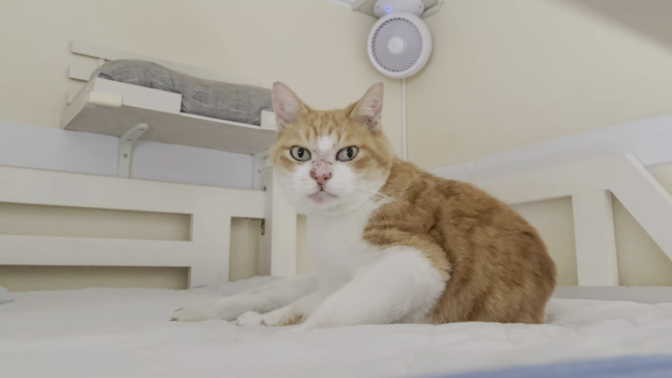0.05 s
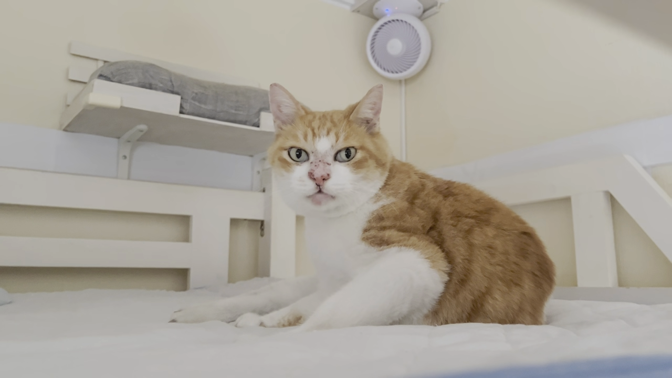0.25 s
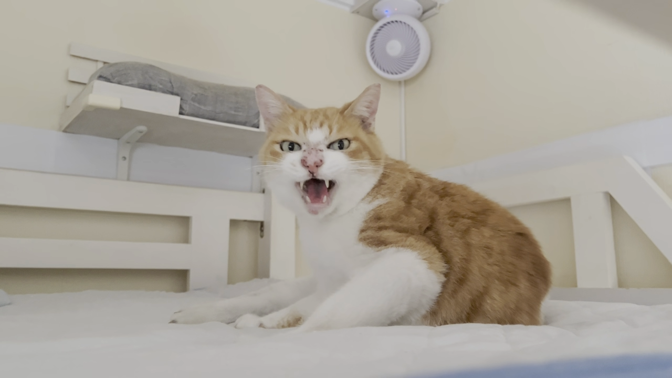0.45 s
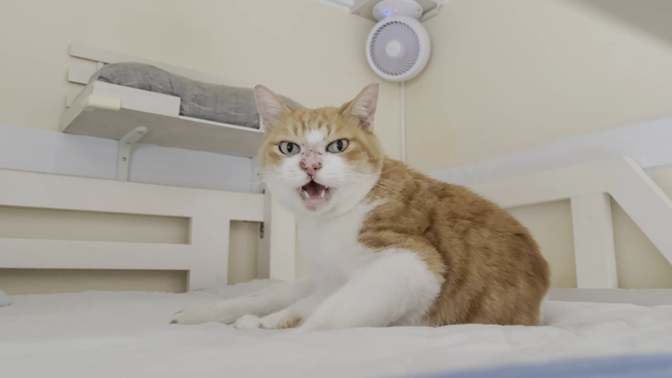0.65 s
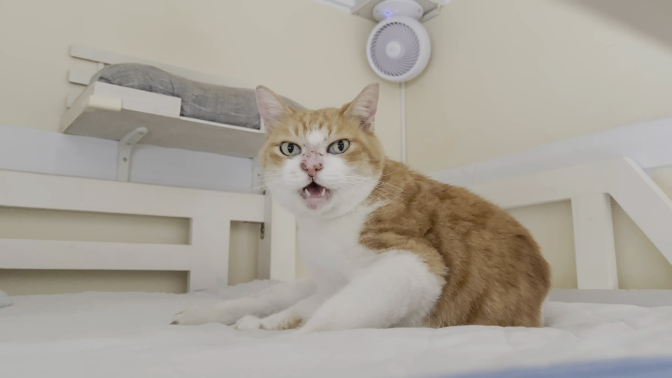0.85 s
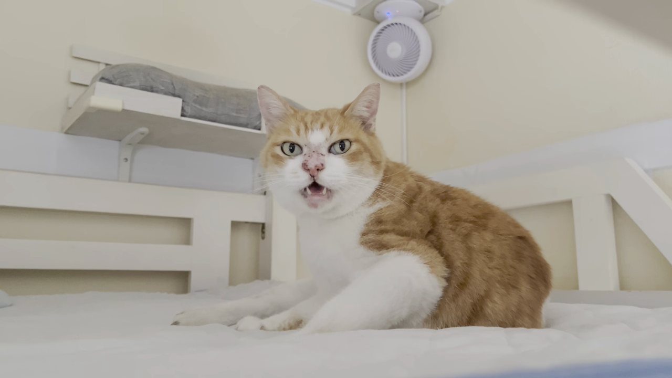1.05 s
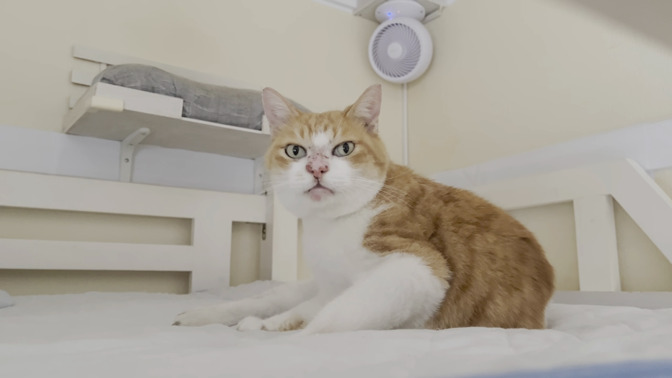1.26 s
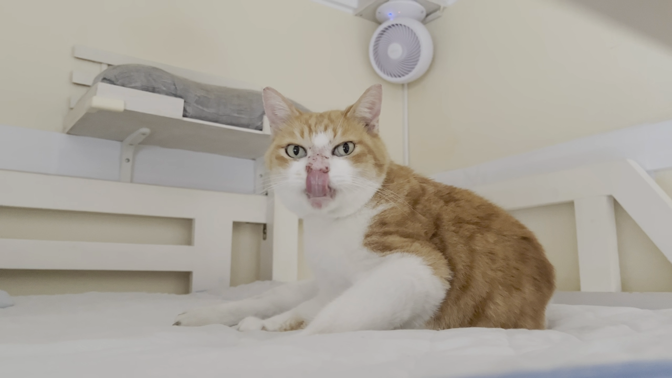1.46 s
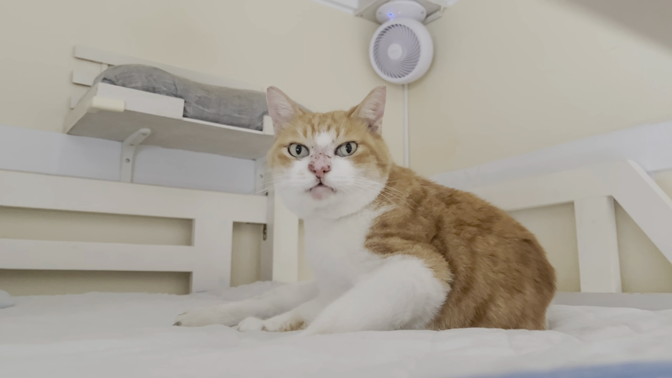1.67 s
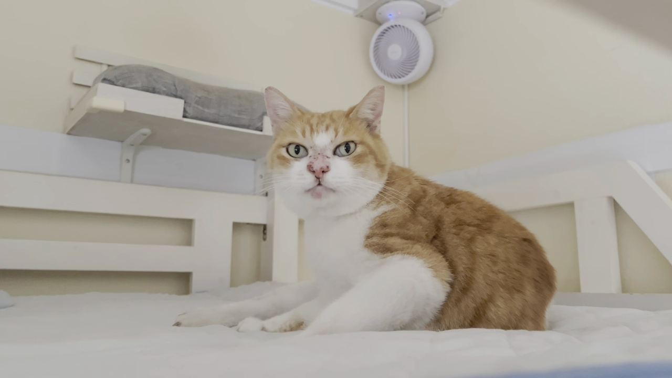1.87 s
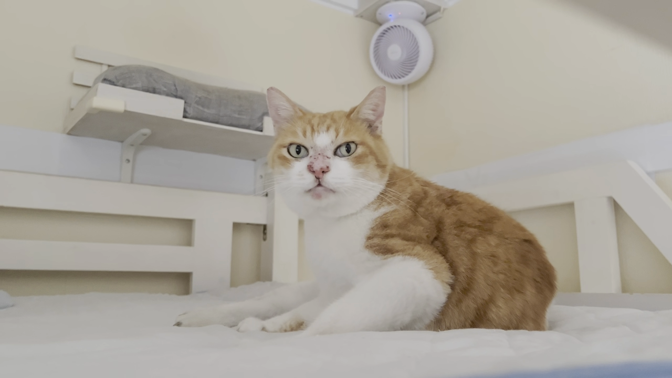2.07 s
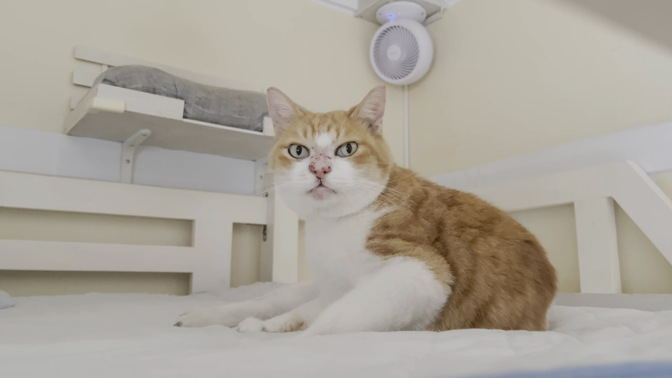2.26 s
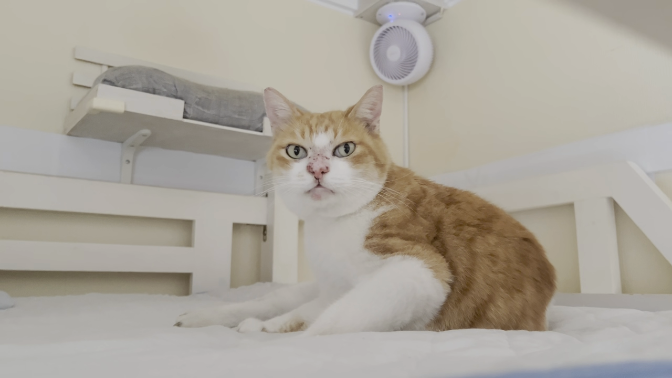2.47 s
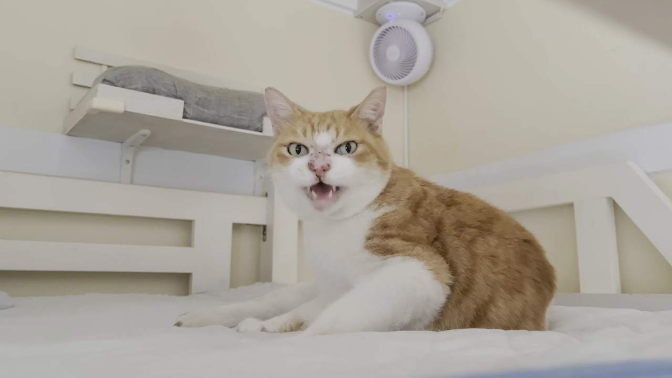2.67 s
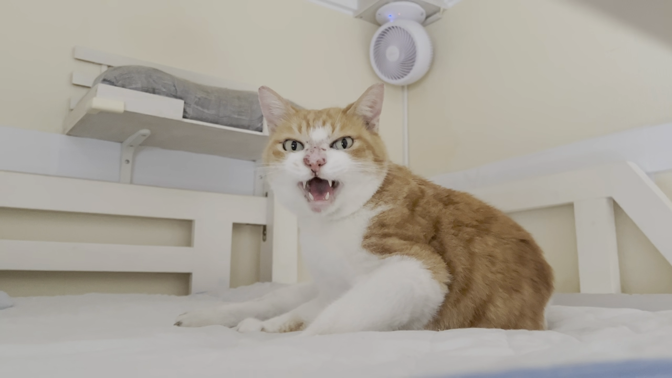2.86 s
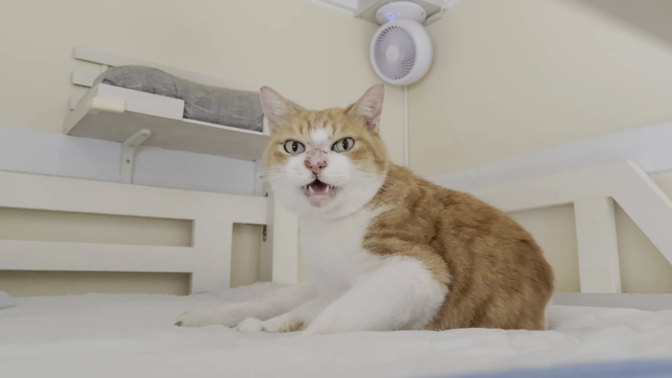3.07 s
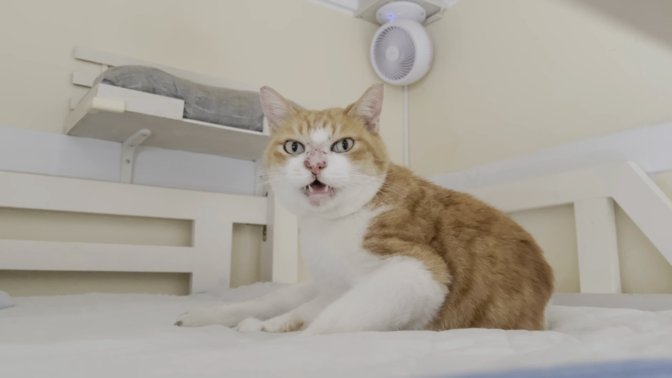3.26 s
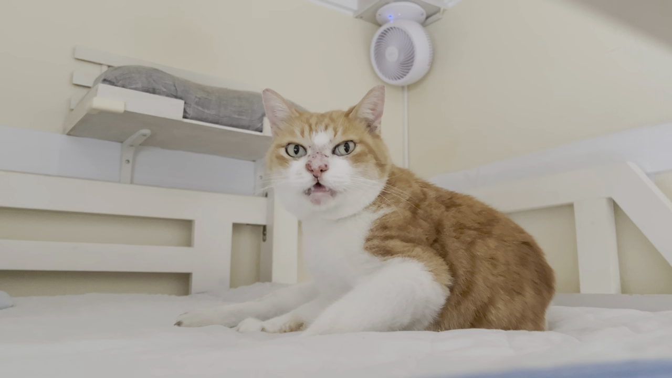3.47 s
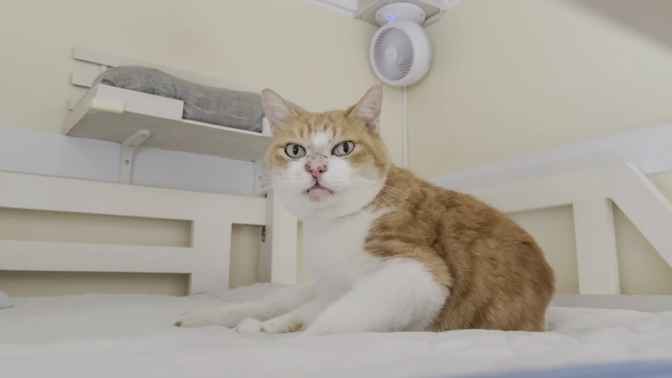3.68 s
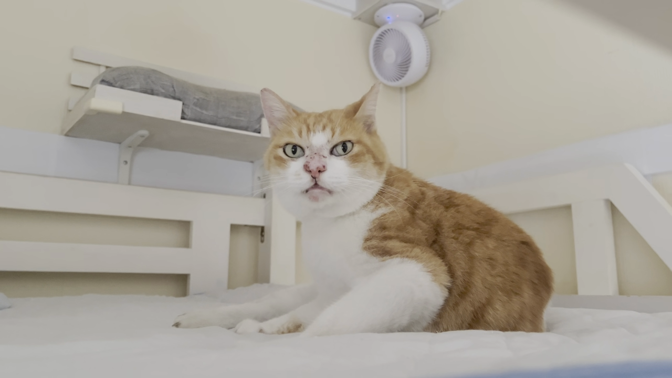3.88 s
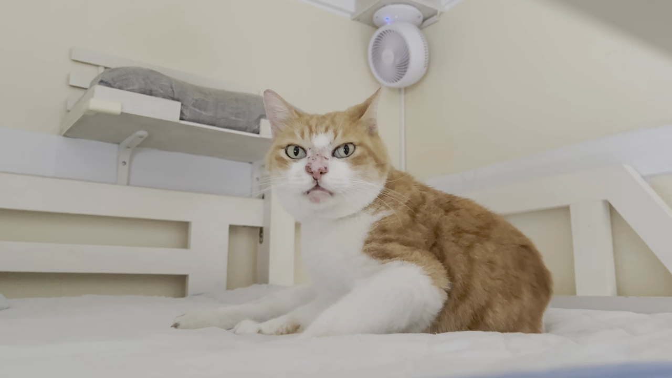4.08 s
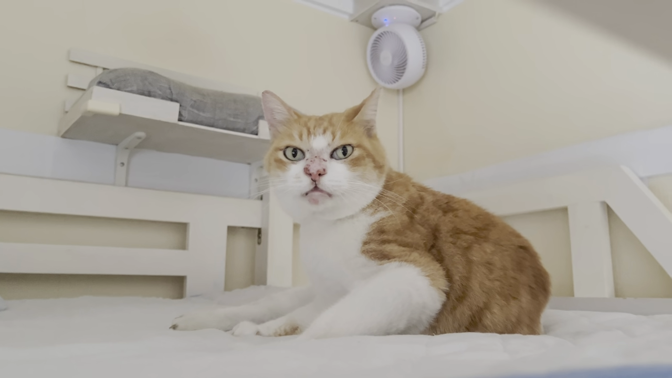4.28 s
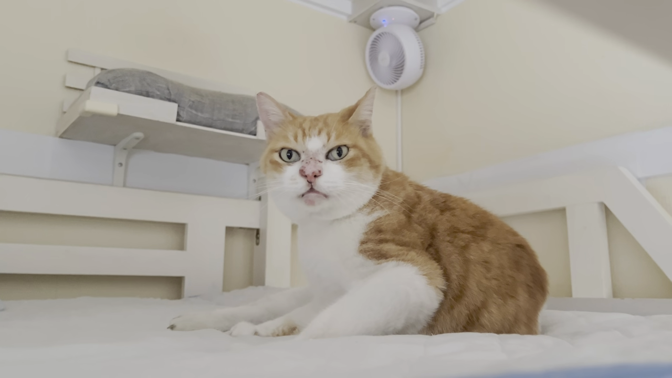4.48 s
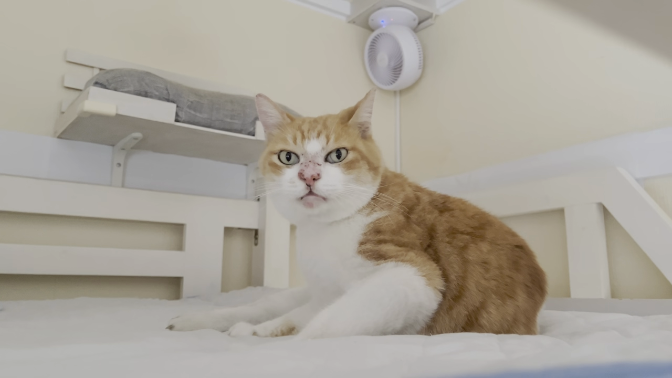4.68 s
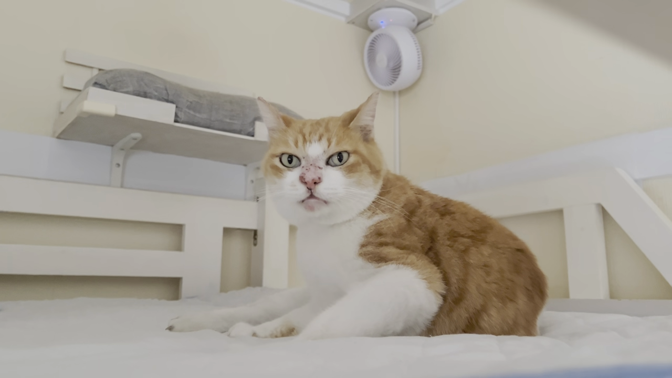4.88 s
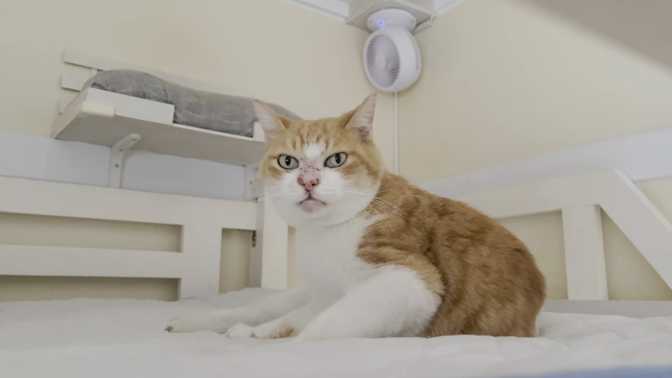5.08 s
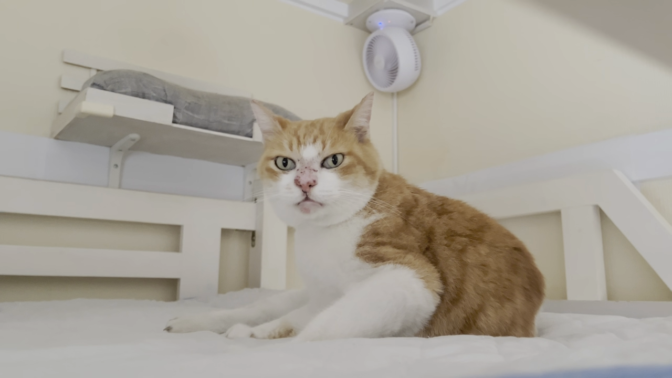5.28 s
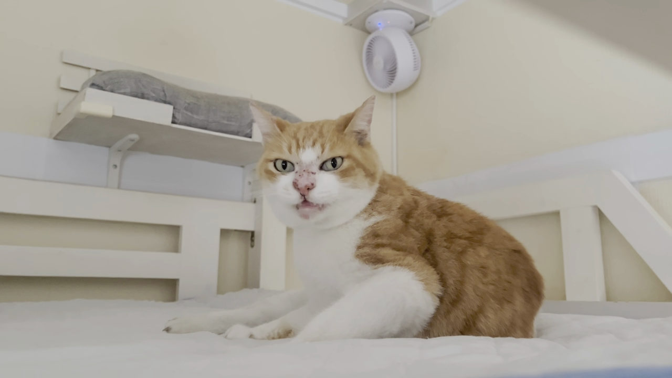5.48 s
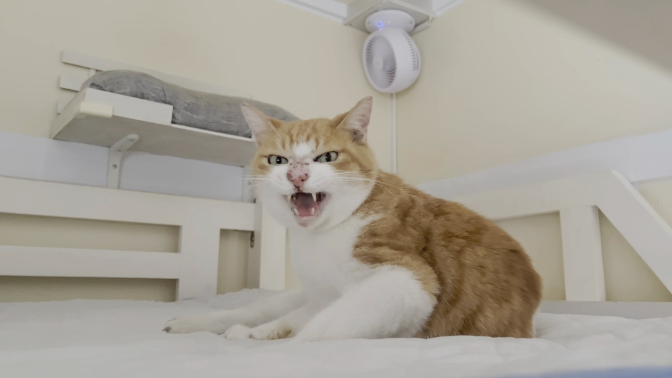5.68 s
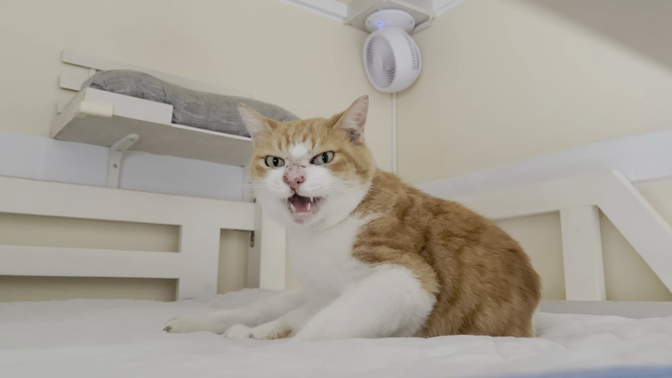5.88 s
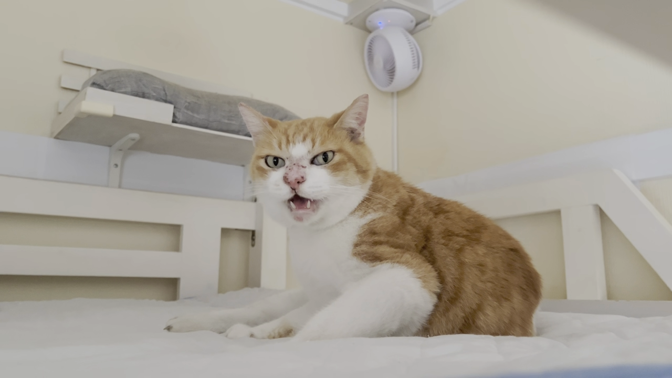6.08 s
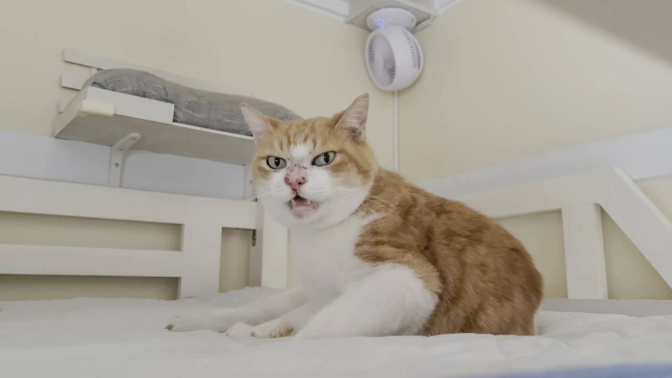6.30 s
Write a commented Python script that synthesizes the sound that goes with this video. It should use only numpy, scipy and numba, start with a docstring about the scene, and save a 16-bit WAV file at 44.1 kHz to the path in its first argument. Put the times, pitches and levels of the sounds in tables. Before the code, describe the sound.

Close phone pickup of a hoarse cat on a bed, with short reflections from nearby walls and a constant soft fan rumble. Three rough, breathy meows come at wide intervals, starting squeaky or creaky, sinking to a gravelly middle and flipping up at the end with a thin toothy whistle. Small mouth clicks, light puffs and dull soft thumps sit quietly in the gaps.

```python
"""A small room with a bed: a fan hums throughout while a hoarse cat gives three raspy meows close to a phone.
Each call opens with a squeak or creak, settles into a rough low voice and breaks upward as the mouth shuts.
Uneven fold pulses and breath ring the throat and mouth; the gape sets rasp, upper resonance and whistle.
Filtered noise bursts make the lip clicks, soft rustles and low bumps around the calls.
The fan is shaped noise over wavering motor tones, with a steady hiss above."""
import sys
import numpy as np
from scipy import signal
from scipy.fft import rfft, irfft, next_fast_len
from scipy.io import wavfile
from scipy.ndimage import uniform_filter1d
from numba import njit

SR = 44100
rng = np.random.default_rng(int(sys.argv[2]) if len(sys.argv) > 2 else 0)


def put_to_file(sound):
    """Save the sound as 16-bit audio at rate SR, in the file named by the first command-line argument."""
    columns = np.atleast_2d(sound).T  # one column per channel
    safe = np.clip(columns, -1, 1)
    whole_steps = np.round(safe * 32767)
    wavfile.write(sys.argv[1], SR, whole_steps.astype(np.int16))


N = 279622
T = np.arange(N) / SR

# fan air, relative spectrum: (frequency [Hz], density [dB])
FAN_AIR = [(12, -50), (20, -29.5), (52, -1), (92, -1.5), (124, -2), (151, -7), (260, -3.5), (302, -9),
           (330, -8.5), (360, -10), (721, -11), (936, -14.5), (1270, -19), (3090, -32.5), (3600, -45.5),
           (4680, -63.5), (7920, -120)]
# steady hiss, relative spectrum: (frequency [Hz], density [dB])
HISS = [(2000, -30.5), (3400, -15), (4190, -15.5), (4880, -3.5), (5720, -3), (6630, -8.5), (7530, -16),
        (8430, -20.5), (9240, -25.5), (11500, -19), (15000, -75), (22000, -120)]
# faint hiss at the very top, relative spectrum: (frequency [Hz], density [dB])
SHEEN = [(6000, -23.5), (9500, -10.5), (11000, -13.5), (15700, 10.5)]
# fan motor tones: (frequency [Hz], rms level [dB])
MOTOR_TONES = [(62.5, -73.5), (124.5, -63.5), (253, -67), (576, -66)]
# likeness of left and right in the air and hiss: (frequency [Hz], correlation [-1 to 1])
LIKENESS = [(60, -0.37), (130, 0.36), (290, 0.61), (640, 0.46), (1400, 0.13), (3100, 0.5), (6800, -0.2),
            (15000, -0.46)]
# left minus right in the room noise: (frequency [Hz], difference [dB])
FAN_SIDE = [(60, 5), (110, -6), (200, -2.5), (380, -2.5), (700, 3), (1290, 3), (2380, -2.5), (4400, 4),
            (8120, -0.5), (15000, -0.5)]
# clean squeak that opens the first meow: (time [s], pitch [Hz], level [dB])
SQUEAK = [(.324, 955, -64), (.331, 953, -40.5), (.345, 1004, -42), (.358, 999, -45), (.372, 977, -38.5),
          (.39, 948, -44), (.42, 930, -53)]
# its harmonics from the fundamental up: (level against the squeak [dB])
SQUEAK_PARTIALS_DB = [2, -4, 1, -24, -21, -19]
# meows: (start [s], whistle onset [s], upward break [s], end [s], pitch at the break [Hz],
# upper resonance at a narrow gape [Hz], its level against the effort in MOUTHS [dB],
# its change at the break [dB], chest level [dB], whistle at a narrow gape [Hz], whistle level [dB])
MEOWS = [ (0.365, 0.516, 0.99, 1.068, 409, 2565, -7, -1.5, -57, 7720, -62.5),
         (2.699, 2.837, 3.298, 3.346, 386.5, 2680, -3.5, 1, -51.5, 7770, -61.5),
         (5.542, 5.85, 6.128, 6.215, 424, 2750, -3.5, -6.5, -53.5, 7527, -64.5), ]
# vocal folds up to the break, one curve a meow: (time [s], pitch [Hz], roughness [0 to 1])
FOLDS = [
    [(.37, 324.8, .6), (.40, 350, .5), (.42, 366.5, 0.16), (.455, 347.7, 0.61), (.51, 317, .5),
     (.55, 298.3, 0.67), (.59, 284.2, 0.23), (.71, 275.1, 0.42), (.775, 274.9, 0.44), (.80, 280, 0.16),
     (.885, 277.5, .16), (.945, 263.9, .5), (.99, 271, 0.57)],
    [(2.70, 135.1, 0.61), (2.75, 138, .45), (2.79, 165, .6), (2.812, 199.1, .15), (2.84, 197.6, 0.19),
     (2.87, 238.4, .85), (3.02, 274.8, .55), (3.15, 248.2, .56), (3.21, 271.5, .58), (3.27, 253.9, 0.72)],
    [(5.545, 553.3, .2), (5.572, 561, .35), (5.588, 684, .36), (5.65, 641, 0.13), (5.688, 599.6, 0.21),
     (5.705, 292.6, 0.66), (5.75, 277, 0.63), (5.81, 273.5, 0.28), (5.858, 270.9, 0.41), (5.88, 262.7, .2),
     (6.01, 260.9, 0.25), (6.11, 251, 0.37)],
]
# jaw and effort, one curve a meow: (time [s], mouth resonance before the lips shut [Hz], effort [dB])
MOUTHS = [
    [(.37, 2780, -39), (.43, 2650, -32.5), (.52, 2370, -32), (.56, 2030, -34), (.62, 1726, -35.5),
     (.77, 1470, -38), (.86, 1414, -35), (.95, 1550, -40), (1.005, 1470, -36.5), (1.07, 1420, -37.5)],
    [(2.70, 2600, -41), (2.77, 2630, -33), (2.797, 2600, -36), (2.825, 2570, -30), (2.87, 2200, -37),
     (2.955, 1640, -40), (3.09, 1610, -42), (3.285, 1570, -43), (3.305, 1500, -39.5), (3.345, 1470, -45)],
    [(5.545, 1350, -50), (5.565, 1500, -45), (5.595, 2540, -39.5), (5.615, 2560, -41.5), (5.65, 2480, -34),
     (5.79, 2340, -33.5), (5.88, 1860, -38.5), (6.01, 1790, -38.5), (6.09, 1560, -41), (6.16, 1600, -38),
     (6.21, 1450, -37.5)],
]
# broad colour of the voice at the phone: (frequency [Hz], gain [dB])
CAT_COLOUR = [(250, 0), (400, -2), (560, 4.5), (830, -1), (1100, 5), (1195, 5), (1270, 1.5), (1410, 7.5),
              (1640, 8), (1850, 1), (2020, -1.5), (2250, 3), (2950, 0), (3350, -4), (4300, -3), (8000, -8)]
# left minus right in the cat's sound: (frequency [Hz], difference [dB])
CAT_SIDE = [(300, 2.5), (600, 5.5), (850, 7), (1200, 12.5), (1600, 3.5), (2000, -3.5), (2300, -0.5),
            (2700, -0.5), (5000, 4.5), (9000, -1)]
# early echoes off the bed frame, shelf and corner: (left delay [ms], right delay [ms], level [dB])
ECHOES = [(0.5, 0.17, -10), (0.73, 0.34, -8.5), (1.13, 0.897, -14), (1.22, 0.81, -25), (1.36, 1.49, -11.5),
          (1.76, 2.12, -23.5), (2.17, 2.26, -11.5), (2.35, 2.71, -8.5), (3.61, 2.4, -15),
          (4.82, 5.8, -18.5), (5.0, 4, -9.5), (5.95, 5.86, -13.5), (6.13, 9.1, -19), (8.6, 8.96, -13.5)]
# lip and tongue clicks: (time [s], peak level [dB], centre [Hz])
CLICKS = [(1.343, -61, 11000), (1.545, -58, 11500), (2.604, -53, 14500), (2.626, -49, 7800),
          (2.634, -57, 8300), (5.488, -54, 8700)]
# soft rustles, puffs and low bumps:
# (time [s], attack [s], decay [s], level [dB], centre [Hz], width [Hz])
STIRS = [(1.58, 0.027, .04, -67, 2400, 2200), (1.60, .04, .05, -49.5, 56.6, 40),
         (2.595, .02, 0.092, -50.5, 650, 704), (2.645, .015, .03, -62, 2000, 2200),
         (3.495, 0.046, .12, -57.5, 2200, 2400), (3.68, 0.048, 0.061, -66.5, 2500, 2600),
         (4.28, .015, 0.022, -53, 40, 30), (4.561, .006, 0.03, -53.5, 1260, 750),
         (5.009, .005, .025, -43, 52, 40), (5.481, .006, .06, -50.5, 900, 750)]

FAN_DB, HISS_DB, SHEEN_DB = -50.5, -68, -78
FAN_LEAD_MS = 0.23  # the fan's air reaches the left port first
# the jaw: mouth resonance when narrow and when wide
NARROW_HZ, WIDE_HZ = 1530, 2470
# the mouth resonance sags and broadens as the lips shut; a wide gape broadens it too (shares of its frequency)
SHUT_S, SHUT_SAG, MOUTH_WIDTH, SHUT_BROADENING, GAPE_BROADENING = 0.11, 0.16, 0.34, 0.14, 0.083
# the upward break: length of the jump, fall of the pitch after it, roughness, extra push in the throat
BREAK_S, BREAK_FALL_HZ_PER_S, BREAK_ROUGH, BREAK_PUSH_DB = .015, 600, .42, 6.5
# a rough voice wavers in pitch (share) and flutters in strength
WAVER, WAVERS_PER_S, FLUTTER_DB, FLUTTERS_PER_S = .012, 70, 3, 130
# the voice starts and stops quickly; a share of the upper resonance lingers
ATTACK_S, RELEASE_S, UPPER_RELEASE_S, UPPER_LINGER_SHARE = 0.0025, 0.007, 0.043, .5
# the throat resonance swells as the call starts, is weaker at a wide gape and rises at the break
THROAT_HZ, THROAT_WIDTH_HZ, THROAT_DB = 773, 765, -47.5
THROAT_START_DB, THROAT_SWELL_S, THROAT_GAPE_DB, THROAT_BREAK_HZ = -3.5, 0.19, -1.5, 220
# a wide gape pushes the upper resonance higher and weakens it; shutting lips pull it down (share)
UPPER_WIDTH_HZ, UPPER_GAPE_HZ, UPPER_GAPE_DB, UPPER_SHUT_SAG = 754, 300, -1.5, 0.035
RASP_NARROW_DB, RASP_WIDE_DB, RASP_SWELL_S = -67, -49, .04
# the nose cuts a notch between throat and mouth, until the voice breaks
NOTCH_HZ, NOTCH_WIDTH_HZ, NOTCH_DEPTH = 1096, 143, 0.63
# the whistle past the teeth lies lower while the jaw is wide, then climbs and swells as the gap closes
WHISTLE_GAPE_HZ, WHISTLE_CLIMB_S, WHISTLE_CLIMB_HZ, WHISTLE_SWELL_DB = 900, .10, 980, 2
WHISTLE_ATTACK_S, WHISTLE_OVERHANG_S, WHISTLE_RELEASE_S = 0.044, 0.027, 0.015
# the whistle's width, and the hiss around it while the mouth is open and as it shuts
WHISTLE_WIDTH_HZ, SKIRT_OPEN_DB, SKIRT_SHUT_DB = 340, -6.5, 0.5
# voice and whistle in the room: lag of the right port, level of the tail
VOICE_LAG_MS, WHISTLE_LAG_MS = .045, .023
VOICE_ROOM_DB, WHISTLE_ROOM_DB, ROOM_T60_S = -1, -3.5, 0.22
RUSTLE_GRAIN_DB, RUSTLE_GRAINS_PER_S = 1.7, 220
TOP_HZ = 15800


def undb(db):
    """Decibels to gain."""
    return 10 ** (np.asarray(db) / 20)


def curves(rows):
    """The columns of a table, joined by straight lines in time."""
    s, *columns = np.transpose(rows)
    return [np.interp(T, s, column) for column in columns]


def envelope(start, end, attack_s, release_s):
    """Straight attack, hold, exponential release."""
    return np.clip((T - start) / attack_s, 0, 1) * np.exp(-np.maximum(T - end, 0) / release_s)


def ramp(end, length_s):
    """Rises from 0 to 1 over the stretch before a moment, then stays at 1."""
    return np.clip((T - end) / length_s + 1, 0, 1)


def during(rows, fade_s):
    """1 while a table lasts, with short fades."""
    return np.clip(np.minimum(T - rows[0][0], rows[-1][0] - T) / fade_s, 0, 1)


def across(points, size=N):
    """(frequency [Hz], value) points read at every bin of a spectrum, along a log frequency scale."""
    hz, value = np.transpose(points)
    bin_hz = np.arange(size // 2 + 1) * SR / size
    return np.interp(np.log(bin_hz + 1), np.log(hz), value)


def colour(x, points, share=1):
    """Filter by a share of a (frequency [Hz], gain [dB]) shape."""
    size = next_fast_len(N, True)
    return irfft(rfft(x, size) * undb(share * across(points, size)), size)[..., :N]


def unit(x):
    """Scale to rms 1."""
    return x / np.sqrt(np.mean(x ** 2))


def even(x, span_s=0.043):
    """Hold the short-time rms at 1, keeping the grain of single pulses."""
    power = uniform_filter1d(x ** 2, int(span_s * SR))
    return x / np.sqrt(np.abs(power) + 1e-12)


def walk(rate):
    """Smooth random wander with a spread near 1, from `rate` random steps a second."""
    k = int(SR / rate)
    steps = np.repeat(rng.standard_normal(N // k + 1), k)
    return 1.3 * uniform_filter1d(uniform_filter1d(steps, k), k)[:N]


@njit
def svf(x, hz, width):
    """State-variable band-pass with moving centre and width."""
    y, band, low = np.empty(len(x)), 0., 0.
    for i in range(len(x)):
        g, k = np.tan(np.pi * hz[i] / SR), width[i] / hz[i]
        v = (band + g * (x[i] - low)) / (1 + g * (g + k))
        band, low, y[i] = 2 * v - band, low + 2 * g * v, k * v
    return y


def ring(x, hz, width_hz, order=1):
    """A resonance; each further pass steepens its skirts."""
    ones = np.ones(len(x))
    for _ in range(order):
        x = svf(x, np.minimum(hz, .45 * SR) * ones, width_hz * ones)
    return x


def noise_pair(spectrum):
    """Shaped noise at two ports, as alike as LIKENESS says; the mean of the ports has rms 1."""
    size = next_fast_len(N, True)
    alike = np.clip(across(LIKENESS, size), -.95, .95)
    mid, side = rfft(rng.standard_normal((2, size))) * np.sqrt([1 + alike, 1 - alike])
    ports = irfft(np.array([mid + side, mid - side]), size)[:, :N]
    ports = colour(ports, spectrum)
    return ports / np.std(ports.mean(axis=0))


def motor_hum():
    """Each motor tone is a sine that wanders a little in pitch and strength."""
    hum = np.zeros(N)
    for hz, db in MOTOR_TONES:
        phase = 2 * np.pi * np.cumsum(hz + 3 * walk(9)) / SR
        hum += undb(db) * np.sqrt(2) * np.sin(phase) * (1 + 0.37 * walk(7.9))
    return hum


def room_noise():
    """The fan's air wavers over its motor tones; a thin steady hiss lies above."""
    air = noise_pair(FAN_AIR) * undb(FAN_DB + 0.67 * walk(5.99))
    air = np.array([air[0], np.roll(air[1], round(FAN_LEAD_MS * SR / 1000))])
    hiss = noise_pair(HISS) * undb(HISS_DB)
    sheen = undb(SHEEN_DB) * colour(rng.standard_normal((2, N)), SHEEN)
    left, right = air + hiss + sheen + motor_hum()
    return np.array([colour(left, FAN_SIDE, share=.5), colour(right, FAN_SIDE, share=-.5)])


def squeak():
    """The tight folds sing one clean high note before they break into a creak."""
    hz, level_db = curves(SQUEAK)
    phase = 2 * np.pi * np.cumsum(hz * (1 + 0.00081 * walk(200))) / SR
    tone = sum(undb(db) * np.sin(k * phase) for k, db in enumerate(SQUEAK_PARTIALS_DB, 1))
    return tone * undb(level_db) * during(SQUEAK, fade_s=0.0028)


@njit
def fold_pulses(hz, stretch, size, rough, chance):
    """One pulse a cycle; roughness scatters the length and strength of each cycle."""
    pulses, phase, p, k = np.zeros(len(hz) + 1), np.empty(len(hz)), 0., 0
    for i in range(len(hz)):
        step = hz[i] / SR * np.exp(stretch * rough[i] ** 2 * chance[k, 0])
        p += step
        if p >= 1:
            p, k = p - 1, k + 1
            strength = np.exp(size * rough[i] * chance[k, 1])
            # share the pulse between two samples to place it finely in time
            pulses[i] += strength * p / step
            pulses[i + 1] += strength * (1 - p / step)
        phase[i] = p
    return pulses[:-1], phase


def larynx(folds, break_s, break_hz, jitter=.16, shimmer=0.22, breath=1.0, puff=0.4):
    """Uneven fold pulses with a puff of air in each cycle; late on, the pitch breaks upward and falls away."""
    hz, rough = curves(folds)
    broken = ramp(break_s + BREAK_S / 2, BREAK_S)
    falling_hz = np.maximum(break_hz - BREAK_FALL_HZ_PER_S * (T - break_s), break_hz / 2)
    hz = (hz + broken * (falling_hz - hz)) * (1 + WAVER * rough * walk(WAVERS_PER_S))
    rough = np.clip(rough + broken * (BREAK_ROUGH - rough), 0, 1)
    chance = rng.standard_normal((N // 20, 2))
    pulses, phase = fold_pulses(hz, float(jitter), float(shimmer), rough, chance)
    air = unit(np.exp(-phase / puff) * rng.standard_normal(N))
    flutter = undb(FLUTTER_DB * rough * walk(FLUTTERS_PER_S))
    return flutter * (even(pulses) + (.2 + breath * rough) * air), air


def jaw(mouth):
    """Gape from 0 (narrow) to 1 (wide), read from the mouth resonance."""
    return np.clip((curves(mouth)[0] - NARROW_HZ) / (WIDE_HZ - NARROW_HZ), 0, 1)


def meow(call, folds, mouth):
    """The larynx rings chest, throat and the moving mouth; the gape governs upper resonance and rasp."""
    start, _, break_s, end, break_hz, upper_hz, upper_db, upper_break_db, chest_db, _, _ = call
    source, air = larynx(folds, break_s, break_hz)
    hoarse = source + 0.36 * air  # extra breath for the upper resonance and the chest
    mouth_hz, level_db = curves(mouth)
    gape, shutting, broken = jaw(mouth), ramp(end, SHUT_S), ramp(break_s, BREAK_S)

    mouth_hz = mouth_hz * (1 - SHUT_SAG * shutting)
    width_hz = (MOUTH_WIDTH + SHUT_BROADENING * shutting + GAPE_BROADENING * gape) * mouth_hz
    vowel = even(ring(source, mouth_hz, width_hz, order=3)) * undb(level_db - 1.5)

    upper_hz = (upper_hz + UPPER_GAPE_HZ * gape) * (1 - UPPER_SHUT_SAG * shutting)
    upper_db = level_db + upper_db + UPPER_GAPE_DB * gape + upper_break_db * broken
    upper = even(ring(hoarse, upper_hz, UPPER_WIDTH_HZ, order=3)) * undb(upper_db)

    throat = even(ring(source, THROAT_HZ + THROAT_BREAK_HZ * broken, THROAT_WIDTH_HZ, order=3))
    swell = ramp(start + THROAT_SWELL_S, THROAT_SWELL_S)
    push_db = BREAK_PUSH_DB * broken + THROAT_START_DB * (1 - swell)
    throat = throat * undb(THROAT_DB + THROAT_GAPE_DB * gape + push_db)
    chest = even(ring(hoarse, 265, 280, order=2)) * undb(chest_db)

    rasp = even(ring(.55 * source + air, 5600, 3600, order=4))
    rasp = rasp * undb(RASP_NARROW_DB + (RASP_WIDE_DB - RASP_NARROW_DB) * gape)
    rasp = rasp * ramp(start + RASP_SWELL_S, RASP_SWELL_S)

    sounding = envelope(start, end, ATTACK_S, RELEASE_S)
    voice = (vowel + throat + chest + rasp) * sounding
    # the notch also fills in as the gape widens
    notch = NOTCH_DEPTH * (1 - broken) * (1 - gape)
    voice = voice - notch * ring(voice, NOTCH_HZ, NOTCH_WIDTH_HZ)
    lingering = UPPER_LINGER_SHARE * envelope(start, end, ATTACK_S, UPPER_RELEASE_S)
    voice = voice + upper * np.maximum(sounding, lingering)
    return colour(voice, CAT_COLOUR)


def teeth(call, mouth):
    """Air whistles in the front of the mouth; it climbs and spreads into a hiss as the gap closes."""
    _, onset, _, end, *_, narrow_hz, level_db = call
    stop = end + WHISTLE_OVERHANG_S
    closing = ramp(stop, WHISTLE_CLIMB_S)
    hz = narrow_hz - WHISTLE_GAPE_HZ * jaw(mouth) + WHISTLE_CLIMB_HZ * closing
    whistle = unit(ring(rng.standard_normal(N), hz + 50 * walk(25), WHISTLE_WIDTH_HZ, order=2))
    skirt = unit(ring(rng.standard_normal(N), hz + 450, 2500, order=3))
    skirt = skirt * undb(SKIRT_OPEN_DB + (SKIRT_SHUT_DB - SKIRT_OPEN_DB) * closing)
    gain = undb(level_db + WHISTLE_SWELL_DB * closing)
    return (whistle + skirt) * gain * envelope(onset, stop, WHISTLE_ATTACK_S, WHISTLE_RELEASE_S)


def bedroom(x, lag_ms, room_db):
    """Direct sound, echoes off the bed frame and walls, and a short soft tail, different at each port."""
    t = np.arange(SR // 2) / SR
    out = []
    for port, sign in enumerate((1, -1)):
        decay = np.exp(-np.log(1000) * t / ROOM_T60_S)
        tail = rng.standard_normal(len(t)) * decay * np.clip(t / 0.0036 - 1, 0, 1)
        response = undb(room_db) * tail / np.sqrt(np.sum(tail ** 2))
        response[port * round(lag_ms * SR / 1000)] += 1  # direct sound
        for echo in ECHOES:
            response[round(echo[port] * SR / 1000)] += undb(echo[2])
        # the echoes ripple the spectrum but leave its broad shape flat
        ripple = rfft(response)
        broad_power = uniform_filter1d(uniform_filter1d(np.abs(ripple) ** 2, size=300), size=300)
        response = irfft(ripple / np.sqrt(broad_power))[:len(t) * 3 // 4]
        heard = signal.fftconvolve(x, response)[:N]
        out.append(colour(heard, CAT_SIDE, share=sign / 2))
    return np.array(out)


def clicks(decay_s=0.00083):
    """Wet lips and tongue part with tiny snaps: decaying noise through a resonance."""
    out, t = np.zeros(N), np.arange(1024) / SR
    for s, db, hz in CLICKS:
        snap = ring(rng.standard_normal(len(t)) * np.exp(-t / decay_s), hz, 3500)
        first = int(s * SR)
        out[first:first + len(t)] += undb(db) * snap / np.abs(snap).max()
    return out


def stirs():
    """Grainy bursts that start quickly and die away: soft rustles, puffs and low bumps."""
    grains = rng.standard_normal(N) * undb(RUSTLE_GRAIN_DB * walk(RUSTLE_GRAINS_PER_S))
    out = np.zeros(N)
    for s, attack, decay, db, hz, width in STIRS:
        burst = even(ring(grains, hz, width, order=2), span_s=0.091)
        out += undb(db) * burst * envelope(s, s + attack, attack, decay)
    return out


def scene():
    """The cat's voice and whistle in the room, over the fan; clicks, rustles and bumps are heard dry."""
    voice = squeak() + sum(meow(*parts) for parts in zip(MEOWS, FOLDS, MOUTHS))
    whistle = sum(teeth(*parts) for parts in zip(MEOWS, MOUTHS))
    cat = bedroom(voice, VOICE_LAG_MS, VOICE_ROOM_DB) + bedroom(whistle, WHISTLE_LAG_MS, WHISTLE_ROOM_DB)
    return room_noise() + cat + clicks() + stirs()


def record(dry):
    """The phone cuts the top with a steep low-pass."""
    return signal.sosfilt(signal.ellip(8, .2, 70, TOP_HZ, fs=SR, output="sos"), dry)


dry = scene()
out = record(dry)
put_to_file(out)
```